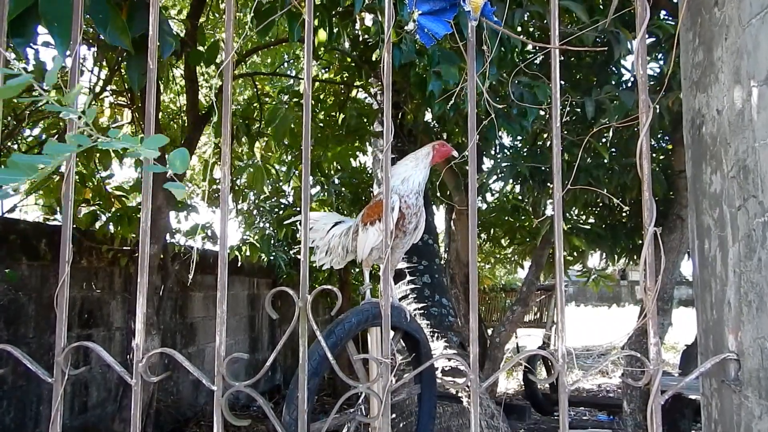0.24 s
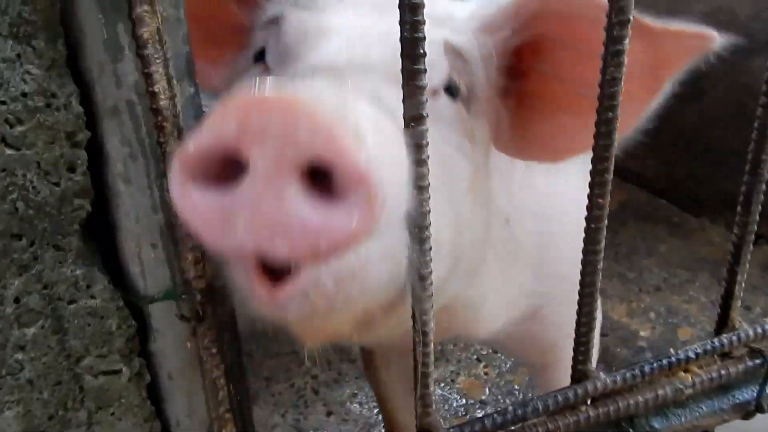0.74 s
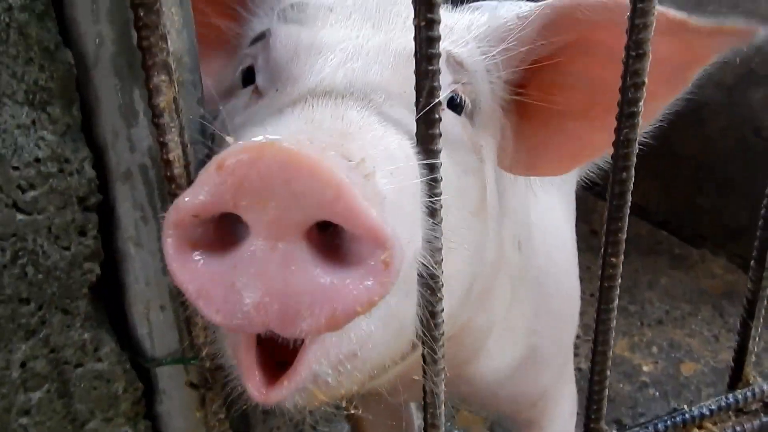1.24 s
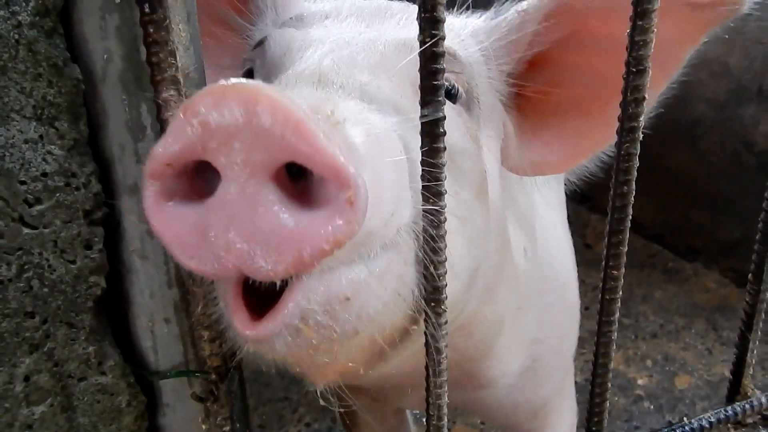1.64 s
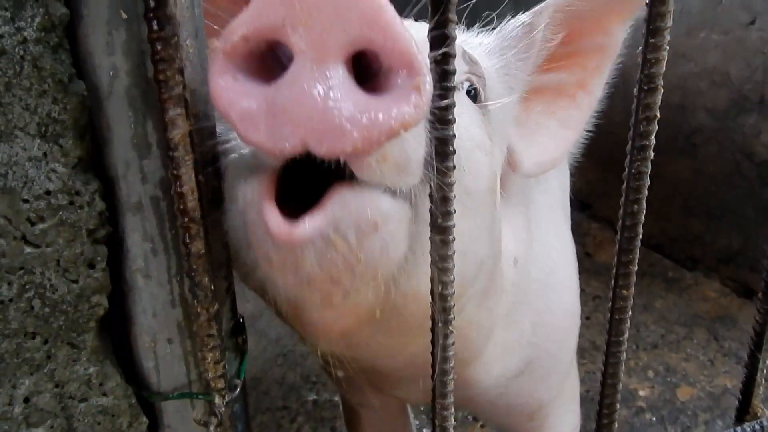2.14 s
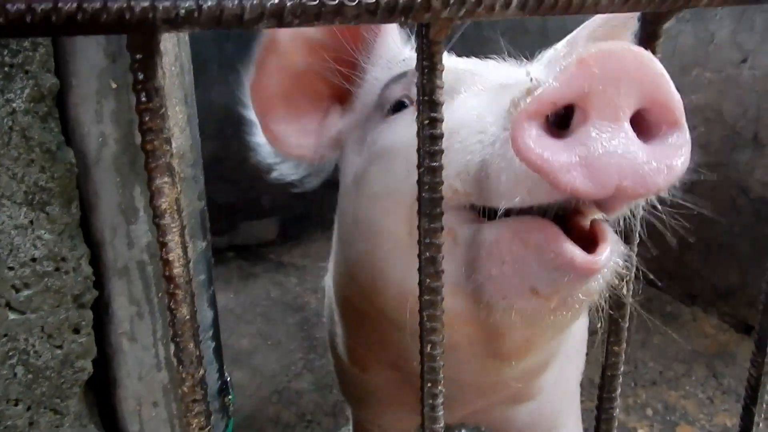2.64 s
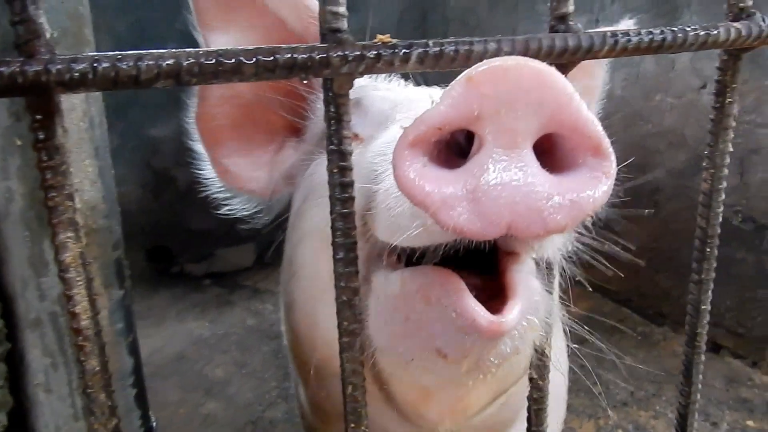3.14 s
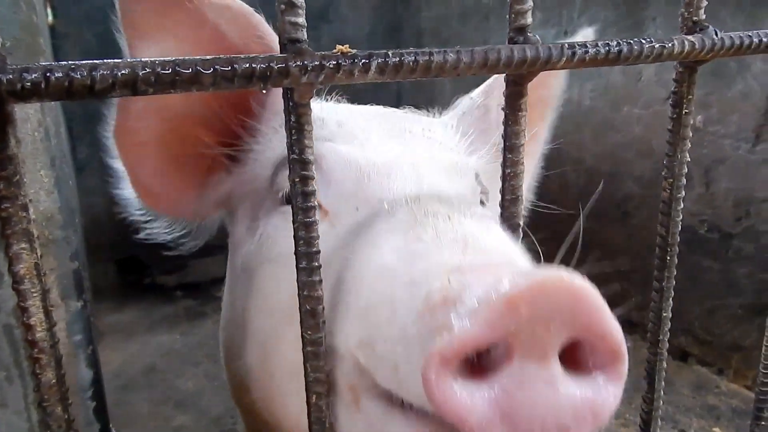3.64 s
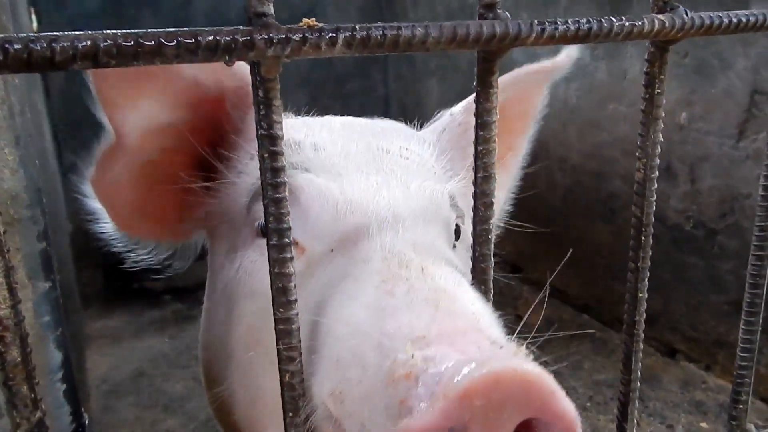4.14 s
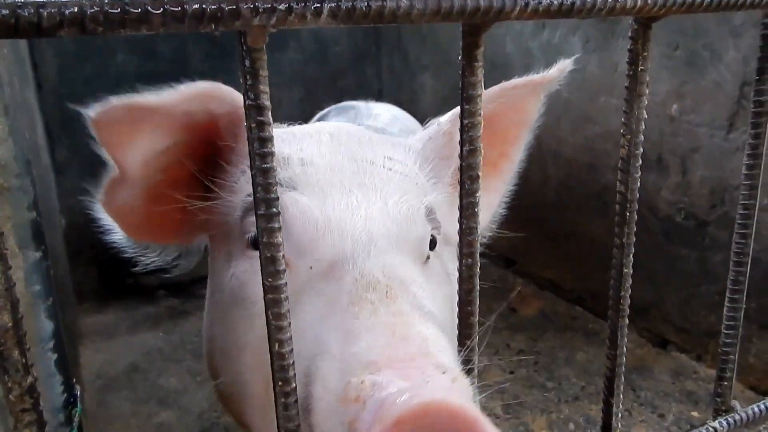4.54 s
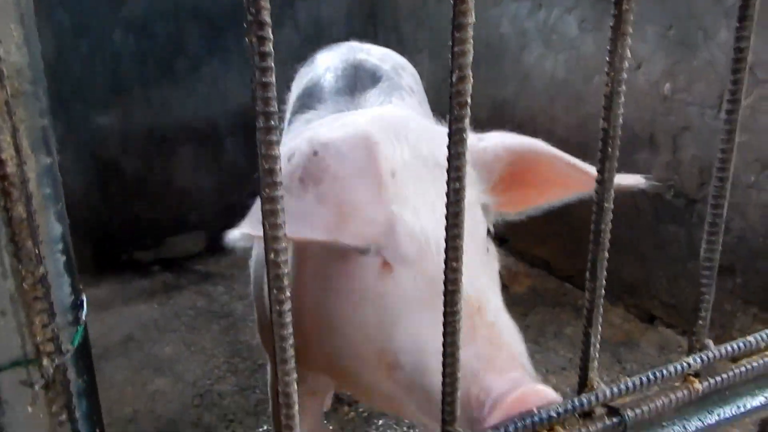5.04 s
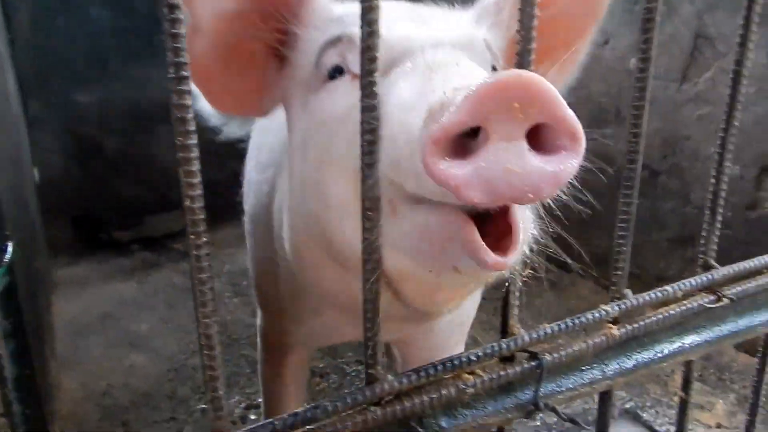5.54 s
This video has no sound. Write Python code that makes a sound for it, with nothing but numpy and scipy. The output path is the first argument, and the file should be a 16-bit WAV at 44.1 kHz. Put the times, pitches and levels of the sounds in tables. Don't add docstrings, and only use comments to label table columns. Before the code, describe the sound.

A rooster's last held note breaks off, a hard cut follows, and a nearby pig grunts and snuffles rhythmically until the end.

```python
import sys
import numpy as np
from scipy import signal
from scipy.fft import rfft, irfft
from scipy.io import wavfile
from scipy.ndimage import uniform_filter1d

SR = 44100
rng = np.random.default_rng(int(sys.argv[2]) if len(sys.argv) > 2 else 0)


def store_pcm(level_fs):
    pcm = np.round(np.clip(level_fs, -1, 1) * 32767).astype(np.int16)
    wavfile.write(sys.argv[1], SR, np.atleast_2d(pcm).T)


def volts_from_decibels(level):
    exponent = np.asarray(level, float) / 20
    return 10 ** exponent


N = 254898

# first pulse t/s, voiced length t/s, effort level/dB,
# fold pulse rate f/Hz at first, at last
GRUNTS = [(.615, 0.16, -14.5, 73.8, 68), (.963, 0.085, -14.5, 56.6, 76), (1.278, 0.16, -17, 66.5, 57.2),
          (1.726, 0.12, -15, 99, 64), (2.251, .116, -16, 85, 55.7), (2.685, 0.12, -17, 74, 77),
          (3.152, 0.16, -18.5, 84, 73.3), (3.581, 0.15, -18, 75, 81), (4.139, 0.11, -21.5, 65, 85),
          (4.662, 0.093, -22.5, 67, 79), (5.372, 0.053, -22.5, 74, 61), (5.682, 0.095, -17.5, 83, 63)]
SURGES = [
    (1.864, .15, -25.5, 51.82, 59.1),
    (2.855, 0.09, -27, 62.66, 60.93),
    (3.755, 0.14, -24, 56.2, 69.7),
    (4.238, 0.14, -26, 70.05, 63.3),
    (4.749, .137, -29, 60.5, 58.1),
    (4.898, 0.069, -22.5, 69, 43.34),
]
MURMURS = [
    (2.575, 0.11, -31, 44.83, 39.86),
    (3.028, 0.13, -37, 41.5, 38.65),
    (3.97, 0.18, -35, 40.5, 43.5),
    (5.017, 0.089, -26.5, 44.6, 42),
]
CATCHES = [
    (.923, 0.019, -22.5, 68, 70.3),
    (2.026, 0.047, -24, 48.4, 48.5),
    (5.135, 0.015, -19.5, 41.8, 41.6),
]
HUMS = [
    (1.644, 0.086, -30, 82, 62),
    (4.586, 0.093, -35.5, 69, 47),
    (5.255, 0.088, -29, 64, 72),
    (5.549, 0.13, -30.5, 66, 70),
]
# start t/s, length t/s, effort level/dB, fold flutter f/Hz, whistle level/dB
SNIFFS = [
    (0.854, 0.072, -38.5, 63.4, 8),
    (1.121, .13, -35, 60.3, 11),
    (2.119, 0.095, -35, 70, 3.5),
    (2.454, 0.052, -31, 55, -6.5),
]
DRAWS = [
    (1.505, 0.14, -63, 88.3, 2),
    (3.4, 0.18, -62, 87.8, 4),
    (4.47, 0.14, -69.5, 84.6, -1.5),
]

VOICED_HISS = .22
# shut and hiss are shares of 1, rise_s is t/s;
# effort starts off by rise_db, changes by sag_db while voiced, then falls (level/dB, fall in dB/s);
# the jaw moves from first to last f/Hz; middle and top regions go from first to last level/dB
GRUNT = dict(shut=0, hiss=0.31, rise_s=0.02, rise_db=-8, sag_db=-8.5, fall_db_per_s=-330, jaw_hz=(809.7, 991),
         middle_db=(-4.5, -1), top_db=(-14, -9.5), trail_db=-4.5)
SURGE = dict(shut=0, hiss=.17, rise_s=0.0067, rise_db=0.5, sag_db=-0.5, fall_db_per_s=-400, jaw_hz=(935.5, 965),
         middle_db=(1.5, 0.5), top_db=(-10, -9.5), trail_db=0)
MURMUR = dict(shut=0.76, hiss=VOICED_HISS, rise_s=0.074, rise_db=-5, sag_db=1.5, fall_db_per_s=-330, jaw_hz=(818, 854),
          middle_db=(-9, -10.5), top_db=(-20, -15.5), trail_db=-15.5)
CATCH = dict(shut=0.8, hiss=VOICED_HISS, rise_s=0.017, rise_db=-1.5, sag_db=-5, fall_db_per_s=-300, jaw_hz=(864, 838),
         middle_db=(-15.5, -8), top_db=(-19, -9.5), trail_db=2.5)
HUM = dict(shut=0.58, hiss=0.24, rise_s=0.051, rise_db=-14.5, sag_db=2, fall_db_per_s=-330, jaw_hz=(770, 813),
       middle_db=(-21.5, -17.5), top_db=(-31.5, -25.5))
SNIFF = dict(widen=2.85, shut=1, hiss=0.24, rise_s=0.13, rise_db=-12.5, sag_db=8.5, fall_db_per_s=-400, jaw_hz=(885, 880),
         middle_db=(-1, -21.5), top_db=(-6, -22.5))
DRAW = dict(widen=2.4, shut=1, hiss=0.17, rise_s=0.024, rise_db=-6, sag_db=-8.5, fall_db_per_s=-400, jaw_hz=(880, 900),
        middle_db=(-1.5, 7.5), top_db=(9, 8.5))

# t/s, brightness level/dB, jaw stretch factor
MOUTH = [(.65, -6, 0.9), (.95, -2.5, 0.99), (1.299, -3, 1.012), (1.75, -4.5, .97), (2.0, -2.5, 0.96),
         (2.299, -1, 0.97), (2.6, -1.5, 1.105), (2.749, 0, 0.98), (3.201, 0.5, 1.003), (3.6, -3, 0.97),
         (4.05, -2.5, 1.037), (4.2, 0.5, 1.035), (4.68, -6, 0.976), (4.768, -1, 0.887), (4.95, -8, 1.007),
         (5.299, 3.5, 1.087), (5.4, 12.5, 1), (5.7, 1.5, 1.014)]
# f/Hz, width f/Hz, level/dB, exponent with which they follow the jaw
OPEN_THROAT = [
    [(224, 20, -14, 0), (426.7, 45, 11.5, 1.46), (542.4, 210, 3, 1.16), (882, 60.2, 12.5, 0.79)],
    [(1410, 19.5, -3, 0.25), (1623.5, 163, 0.5, 0.98), (2115, 180, -5.5, 0.35)],
    [(2943, 246, 5, 0), (3680, 420, -2, 0.71), (4325, 970, -5.5, 0.52), (5260, 670, -8.5, 0.22),
     (5973, 1000, -7.5, 0.023), (6400, 300, -9.5, 0.75), (7940, 900, -20, 0.16)],
]
SHUT_THROAT = [
    [(120, 32, 8, 0.55), (246.6, 78, 8.5, 0), (525, 39.3, 7, 0.066), (851.5, 44, 8.5, 0.85)],
    [(1228, 6.4, 15.7, 0.023), (1777, 9.1, 8.5, 0.01), (2150, 390, 7.6, 0.015)],
    [(2764, 57, 7, 0.019), (3090, 93, 7, 0.0058), (3960, 490, -26, 0.0059), (4800, 1000, -8.5, 0.012),
     (5740, 330, -4, 0.026), (6420, 210, 3, 0.0032), (6944, 250, -16.5, 0.02)],
]
# low edge f/Hz, high edge f/Hz
REGIONS = [
    (120, 1200),
    (1050, 2500),
    (2400, 10000),
]
# t/s, peak level/dB
SLAPS = [
    (0.982, -6.5),
    (0.9984, -21),
    (2.754, -41),
    (3.2343, -42),
    (5.386, -51),
    (5.4126, -47.5),
    (5.7764, -29.5),
]

# t/s, pitch f/Hz, effort level/dB
CROW = [
    (0.0, 860, 0),
    (0.139, 846.2, -1.5),
    (0.264, 829.6, -1),
    (0.362, 798, -1.5),
    (0.386, 773, -2.5),
    (0.388, 715, 8.5),
    (0.401, 707, -16),
    (0.404, 576, -47.5),
]
# f/Hz, half width f/Hz,
# level/dB
BEAK = [(620, 100, -24), (795, 60, -16), (1710, 170, -15), (2400, 80, -40), (3350, 90, -31),
        (4080, 60, -56), (4900, 80, -66), (6030, 110, -24), (6400, 90, -32), (6950, 200, -30),
        (8280, 70, -40), (9900, 120, -52), (12700, 300, -62)]

# f/Hz, level/dB (per Hz)
YARD_AIR = [(18, -42), (30, -28.5), (86, -0.5), (254, -3), (328, -10.5), (378, -7.5), (445, -13),
            (1620, -4), (2530, -23.5), (4340, -23), (8170, -33.5), (10600, -101), (18000, -120)]
PEN_AIR = [(20, -49), (45, -27.5), (90, 1.5), (180, -3), (300, -13.5), (1100, -29), (1800, -22),
           (3900, -43.5), (6300, -35), (8200, -37), (11000, -93.5)]
# f/Hz, correlation
LIKENESS = [(100, 0.99), (1900, 0.94), (4000, 1), (8000, .1)]
# f/Hz, left minus right level/dB
PORT_TILT = [(60, 1.1), (200, 1.6), (680, 1.36), (2290, 0.5), (7720, 0.7)]
# start t/s, end t/s
CHANGE = (.596, .611)

JAW_S, LET_GO_S = 0.14, 0.07
LEAD_IN_S = 0.0028


def pig():
    rows = []
    for table, kind in ((GRUNTS, GRUNT), (SURGES, SURGE), (MURMURS, MURMUR), (CATCHES, CATCH), (HUMS, HUM)):
        rows += [(row, kind) for row in table]
    for table, kind in ((SNIFFS, SNIFF), (DRAWS, DRAW)):
        for start, length, effort_db, rate, whistle_db in table:
            rows.append(((start, length, effort_db, rate, rate), dict(kind, whistle_db=whistle_db)))
    starts = np.sort([row[0] for row, _ in rows] + [N / SR])
    out = np.zeros(N)
    for row, kind in rows:
        following = starts[starts > row[0]][0]
        add(out, *breath(row, following, **kind))
    thin_bass = signal.butter(3, 150, "high", fs=SR, output="sos")
    out = signal.sosfilt(thin_bass, out)
    return out + volts_from_decibels(-13) * walls(out, t60=0.1, start=0.00067, apart=1.0)


def breath(row, until, shut, hiss, rise_s, rise_db, sag_db, fall_db_per_s, jaw_hz, middle_db, top_db,
           whistle_db=0, widen=1, trail_db=-8):
    start, length, effort_db, first, last = row
    end = min(start + length + LET_GO_S, until - 0.003)
    t = np.arange(start - LEAD_IN_S, end + 0.02, 1 / SR)
    age = np.clip(t - start, 0, length)
    after = np.clip(t - start - length, 0, end - start - length)
    gape = np.minimum(age / JAW_S, 1)
    when, bright_db, stretch = np.transpose(MOUTH)
    jaw = np.interp(t, when, stretch) * (jaw_hz[0] + (jaw_hz[1] - jaw_hz[0]) * gape) / 890

    low_db = effort_db + rise_db * np.maximum(1 - age / rise_s, 0) + sag_db * age / length
    low_db = low_db + fall_db_per_s * after
    shared_db = low_db + whistle_db + np.interp(t, when, bright_db) + trail_db * after / LET_GO_S
    levels_db = [low_db] + [shared_db + a + (b - a) * gape for a, b in (middle_db, top_db)]

    pace = [(start, first), (start + length, last)]
    blow_db = 1.3 * rng.standard_normal(60)
    crispness = (0.95, 0.85 - 0.2 * shut, 0.6 - 0.2 * shut)
    out = 0
    for opened, closed, edges, db, crisp in zip(OPEN_THROAT, SHUT_THROAT, REGIONS, levels_db, crispness):
        steady = hiss + (1 - hiss) * (0.1 + 0.7 * shut) * (0.95 - crisp)
        own_db = blow_db + 2.3 * rng.standard_normal(60)
        drive = folds(t, pace, steady, crisp ** (1 + 2 * shut), own_db) * (t < end)
        ring = 0
        for tract, share in ((opened, 1 - shut), (closed, shut)):
            if share > 0.01:
                ring = ring + share * throat(drive, t, tract, jaw, widen)
        band = signal.butter(2, edges, "band", fs=SR, output="sos")
        ring = signal.sosfilt(band, ring)
        loudness = np.sqrt(uniform_filter1d(ring ** 2, size=2000, mode="reflect") + 1e-9)
        held = np.interp(np.minimum(t, end - 0.01), t, loudness)
        out = out + volts_from_decibels(db) * ring / held
    return t[0], out


def folds(t, pace, hiss, crisp, own_db):
    s, rate = np.transpose(pace)
    turns = np.cumsum(np.interp(t, s, rate)) / SR - LEAD_IN_S * rate[0]
    live = (t < s[-1] + 0.003) & (turns >= 0)
    size = volts_from_decibels(own_db)[turns.astype(int)] * live
    slap = np.diff(np.floor(turns), prepend=-1) * size * np.sqrt(SR / np.mean(rate))
    slap = signal.oaconvolve(slap, np.hanning(9) / 4)[:len(t)]
    puffs = np.exp(-(turns % 1) / 0.22) * size
    share = np.where(live, hiss, 0.9)
    pulses = crisp * slap + 3.5 * (1 - crisp) * puffs * noise(t)
    return (1 - share) * pulses + 0.8 * share * noise(t)


def throat(drive, t, tract, jaw, widen):
    rings = 0
    for hz, width_hz, db, follow in tract:
        gain = volts_from_decibels(db + 3.8 * wander(t))
        centre_hz = hz * jaw ** follow * (1 + 0.017 * wander(t))
        rings = rings + gain * resonate(drive, centre_hz, width_hz * widen)
    return evened(rings)


def resonate(x, hz, width_hz):
    turn = np.exp(2j * np.pi * np.cumsum(hz) / SR)
    r = np.exp(-np.pi * width_hz / SR)
    q = r ** 4.62
    smooth = signal.lfilter([(1 - r) * (1 - q)], [1, -r - q, r * q], x / turn)
    return 2 * (turn * smooth).imag


def wander(t):
    return np.interp(t - t[0], np.arange(30) / 45, rng.standard_normal(30)) * 1.2


def slaps():
    out = np.zeros(N)
    t = np.arange(200) / SR
    for s, db in SLAPS:
        add(out, s, volts_from_decibels(db + 7) * rng.standard_normal(200) * np.exp(-t / 0.00018))
    return signal.sosfilt(signal.butter(2, (6000, 13500), "band", fs=SR, output="sos"), out)


def rooster():
    s, hz, effort_db = np.transpose(CROW)
    t = np.arange(0, s[-1], 1 / SR)
    broken = np.clip((t - 0.383) / 0.013, 0, 1)
    wobble = evened(uniform_filter1d(noise(t), size=60))
    pitch = np.interp(t, s, hz)
    turns = np.cumsum(pitch * (1 + (0.00054 + 0.08 * broken) * wobble)) / SR
    note = 0
    for k in range(1, 16):
        crack = volts_from_decibels(-3 * k * broken)
        phase = 2 * np.pi * (k * turns + k * k / 5)
        note = note + np.sqrt(2) * beak(k * pitch) * crack * np.cos(phase)
    out = np.zeros(N)
    add(out, 0, note * volts_from_decibels(np.interp(t, s, effort_db)))
    return out + volts_from_decibels(-10.0) * walls(out, t60=0.13, start=0.0033, apart=0.58)


def beak(hz):
    power = sum((volts_from_decibels(db) / (1 + ((hz - centre) / width) ** 2)) ** 2 for centre, width, db in BEAK)
    return volts_from_decibels(microphone_db(hz, 8500, 100)) * np.sqrt(power)


def walls(x, t60, start, apart):
    t = np.arange(SR // 2) / SR
    signs = rng.choice([-1., 1.], (2, len(t)))
    present = rng.random((2, len(t))) < 0.06
    taps = signs * present * volts_from_decibels(-60 * t / t60) * (t > start)
    side = signal.lfilter([1, -1], [1, -0.5], taps[1])
    pair = np.array([taps[0] + apart * side, taps[0] - apart * side]) / np.linalg.norm(taps[0])
    return signal.fftconvolve(x[None], pair, axes=1)[:, :N]


def microphone_db(hz, edge_hz, softness_hz):
    notch = -18 / (1 + ((hz - 2510) / 45) ** 2)
    return notch - 12 / (1 + np.exp((edge_hz - hz) / softness_hz))


def ports(x):
    hz = np.fft.rfftfreq(N, 1 / SR)
    left_lead_s = 1.2e-5
    half = volts_from_decibels(read(PORT_TILT, hz) / 2) * np.exp(1j * np.pi * hz * left_lead_s)
    return irfft(rfft(x) * [half, 1 / half], N)


def air(spectrum, level_db, patchy_db):
    frames, hz = N // 256 + 5, np.fft.rfftfreq(1024, 1 / SR)
    a, b, c, d, patches = rng.standard_normal((frames, 513, 5)).T
    patches = uniform_filter1d(patches, size=10, axis=0)
    patches = evened(uniform_filter1d(patches, size=8, axis=1))
    same = np.clip(read(LIKENESS, hz), -1, 1)[:, None]
    left, other = a + 1j * b, c + 1j * d
    z = np.array([left, same * left + np.sqrt(1 - same ** 2) * other])
    z *= volts_from_decibels(read(spectrum, hz)[:, None] + patchy_db * patches)
    return volts_from_decibels(level_db) * evened(signal.istft(z, nperseg=1024, noverlap=768)[1][:, :N])


def ducked(loud):
    recover_s = 0.11
    r = np.exp(-1 / (recover_s * SR))
    power = signal.lfilter([1 - r], [1, -r], (loud ** 2).mean(0))
    power_db = 10 * np.log10(power + 1e-12)
    return volts_from_decibels(-5 * np.clip((power_db + 53.5) / 15, 0, 1))


def noise(t):
    return rng.standard_normal(SR // 2)[:len(t)]


def evened(x):
    return x / np.sqrt(np.mean(x ** 2) + 1e-20)


def read(points, hz):
    f, value = np.transpose(points)
    return np.interp(np.log(hz + 1), np.log(f + 1), value)


def add(mix, s, sound):
    part = mix[round(s * SR):][:len(sound)]
    part += sound[:len(part)]


def scene():
    t = np.arange(N) / SR
    yard = (rooster() + air(YARD_AIR, -42, patchy_db=0.5)) * (t < CHANGE[0])
    voice = pig()
    pen = voice + ducked(voice) * air(PEN_AIR, -39, patchy_db=2.5)
    pen = pen * np.clip((t - CHANGE[1]) / 0.012, 0, 1)
    hz = np.fft.rfftfreq(N, 1 / SR)
    colour_db = microphone_db(hz, 8400, 150) - 12 * np.sqrt(np.maximum(hz - 9500, 0) / 1000)
    pen = irfft(rfft(pen) * volts_from_decibels(colour_db), N)
    return ports(yard + pen + slaps() * volts_from_decibels([[5], [-8]]))


def low_pass(x):
    return signal.sosfilt(signal.butter(12, 15800, fs=SR, output="sos"), x)


def record(dry):
    limited = np.tanh(dry)
    return low_pass(limited)


dry = scene()
out = record(dry)
store_pcm(out)
```